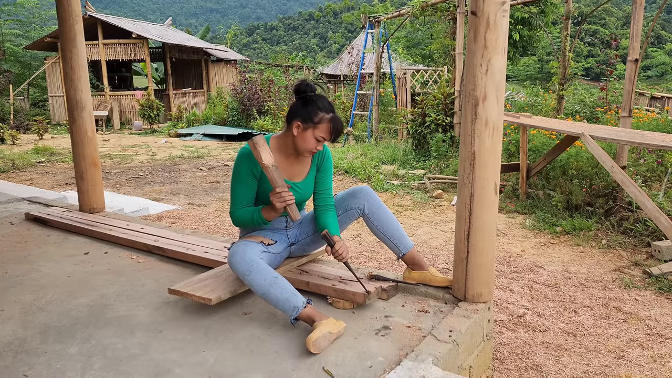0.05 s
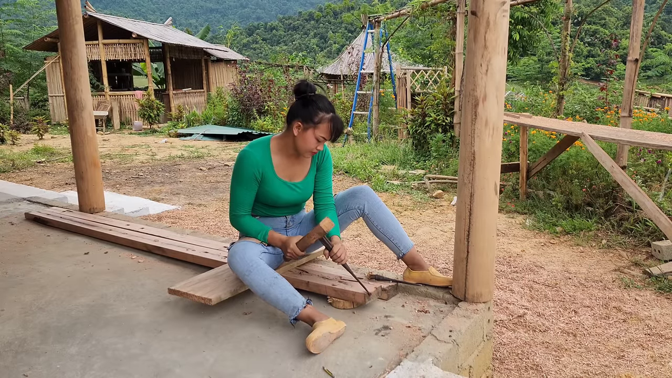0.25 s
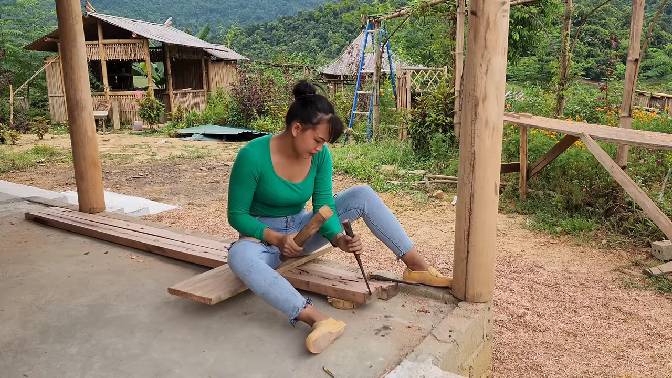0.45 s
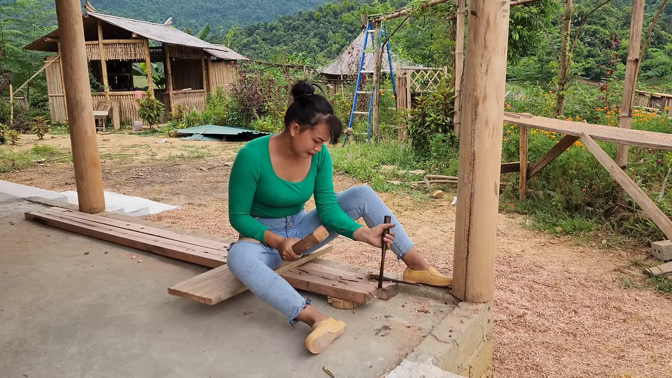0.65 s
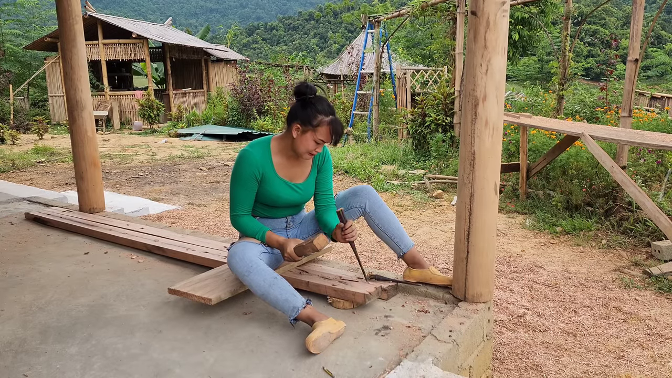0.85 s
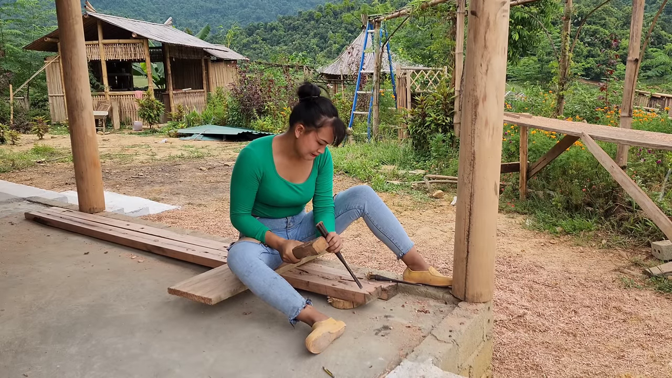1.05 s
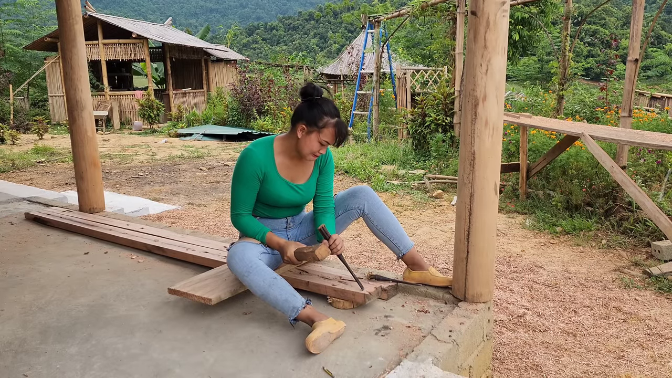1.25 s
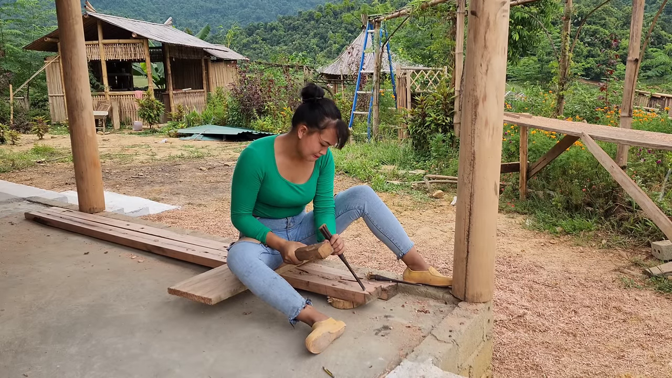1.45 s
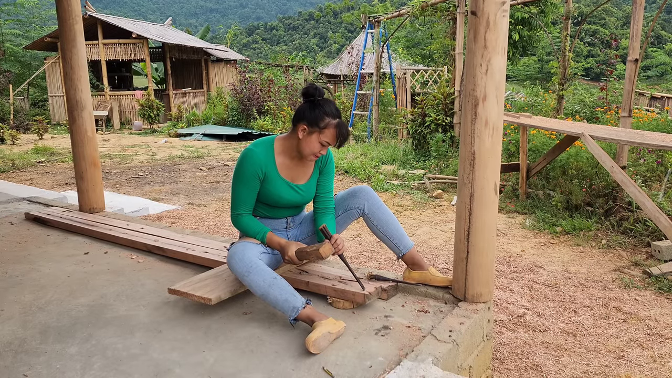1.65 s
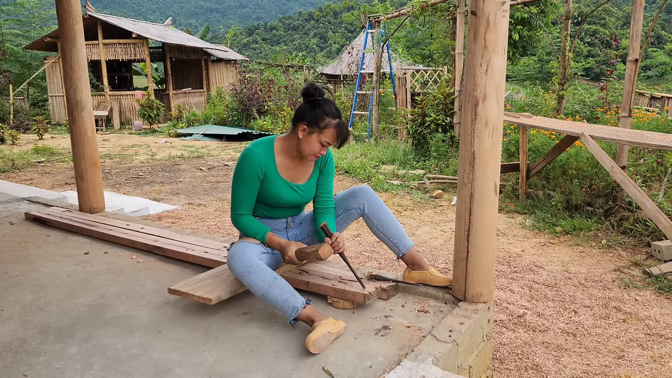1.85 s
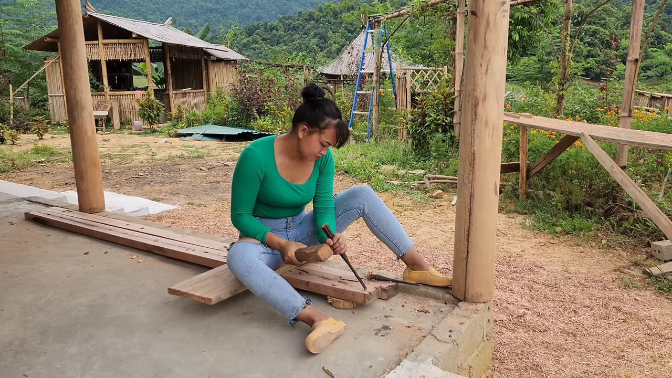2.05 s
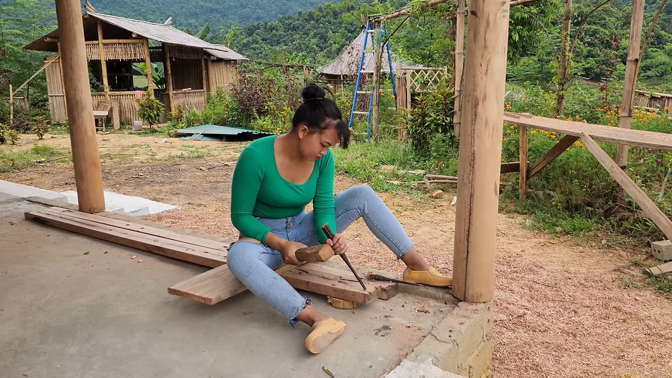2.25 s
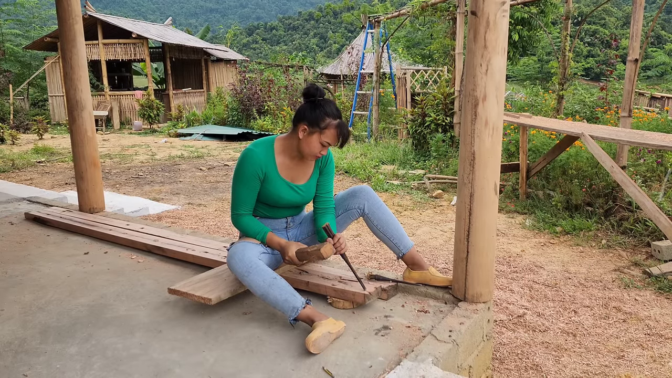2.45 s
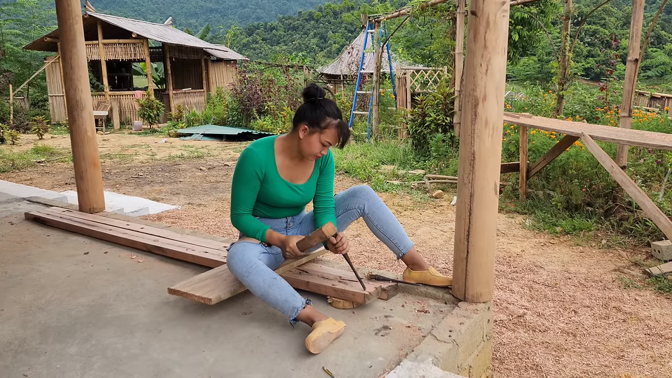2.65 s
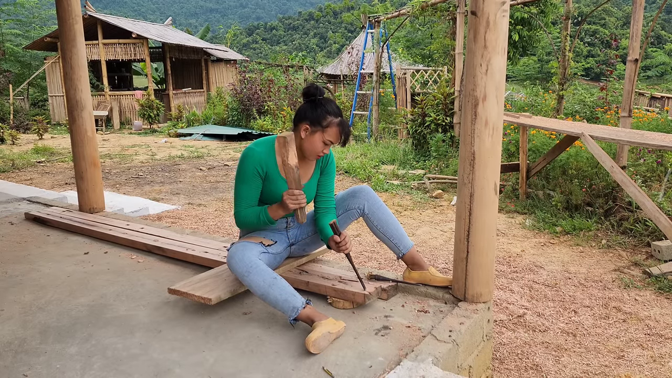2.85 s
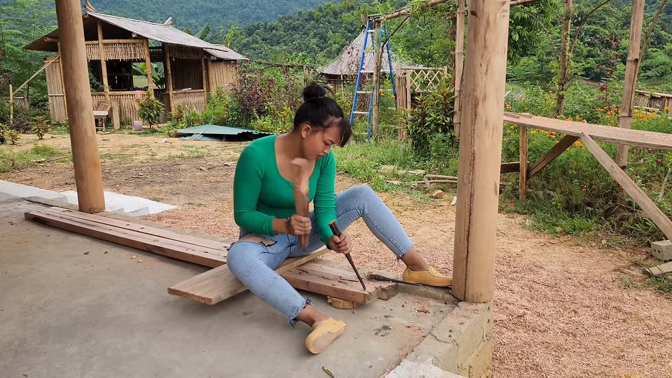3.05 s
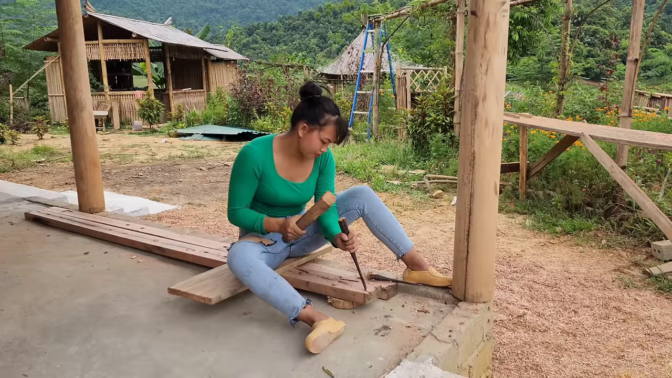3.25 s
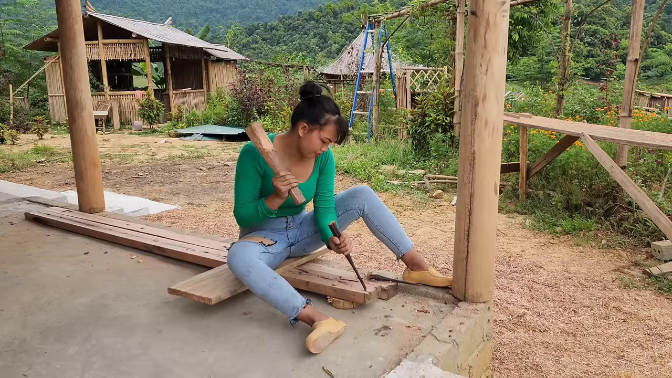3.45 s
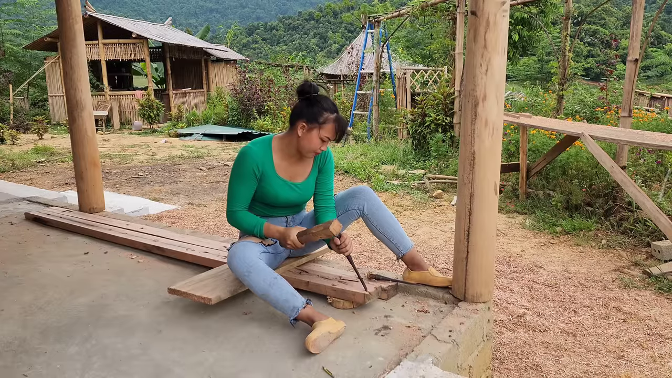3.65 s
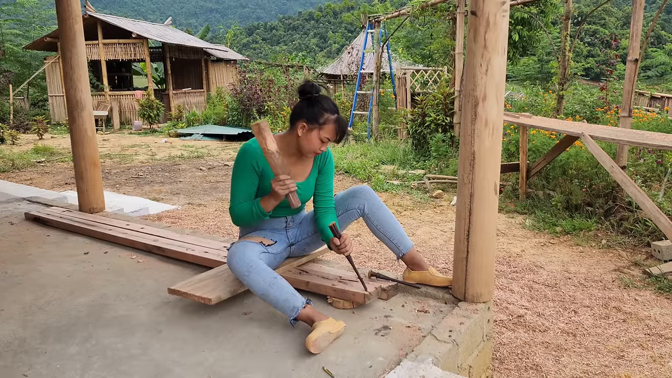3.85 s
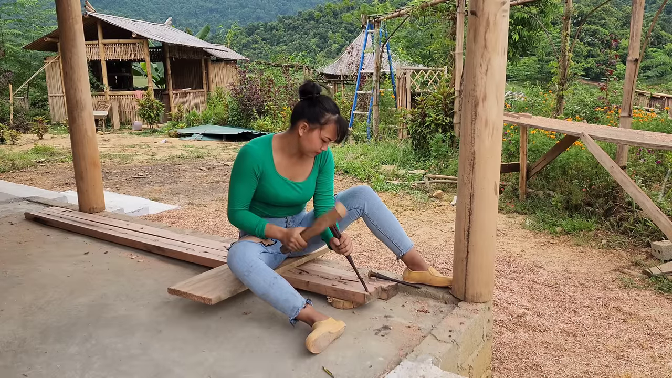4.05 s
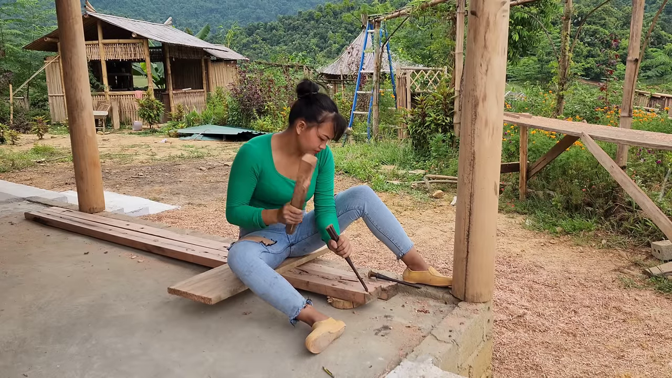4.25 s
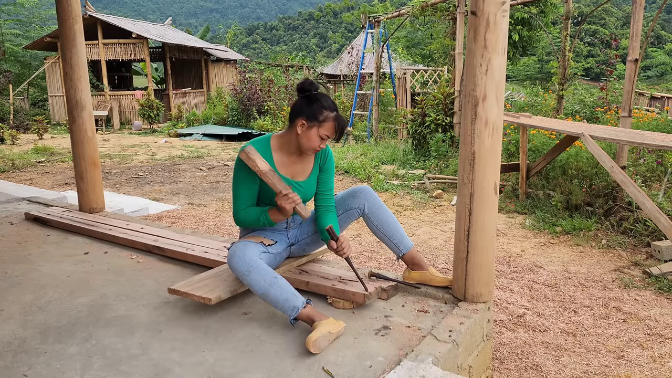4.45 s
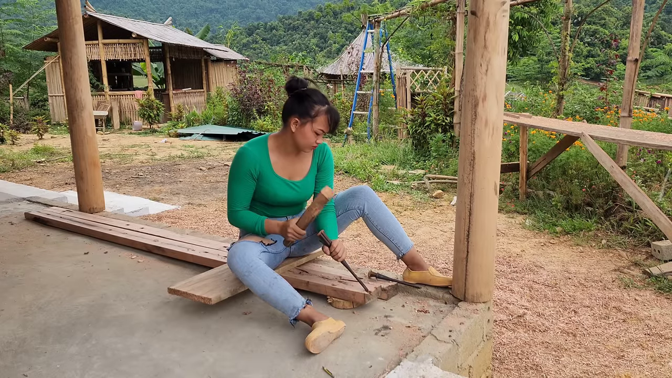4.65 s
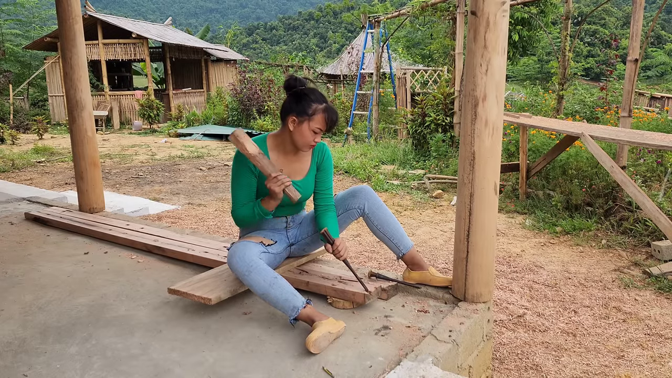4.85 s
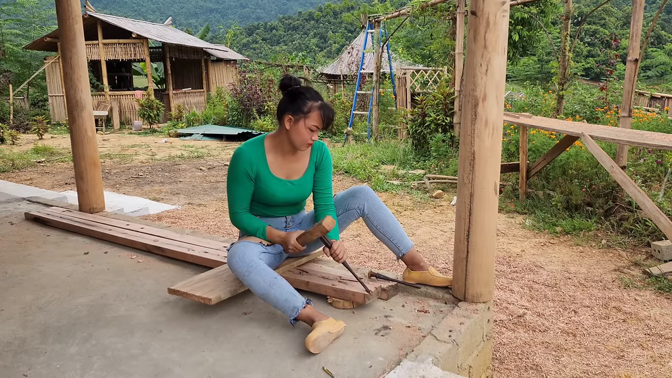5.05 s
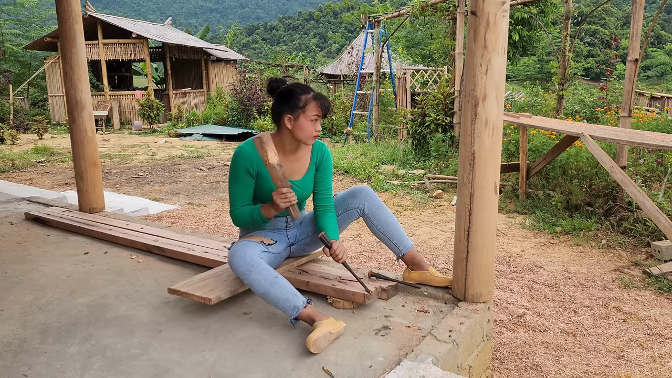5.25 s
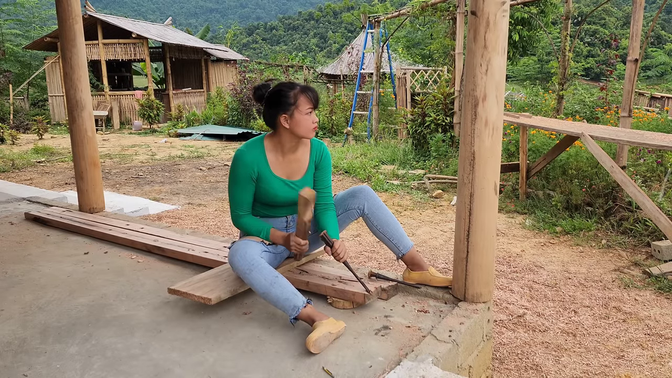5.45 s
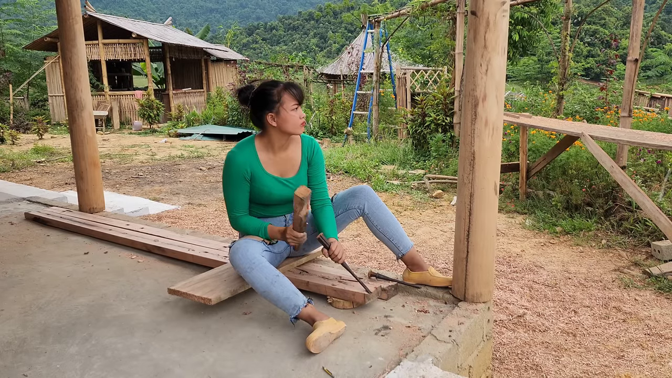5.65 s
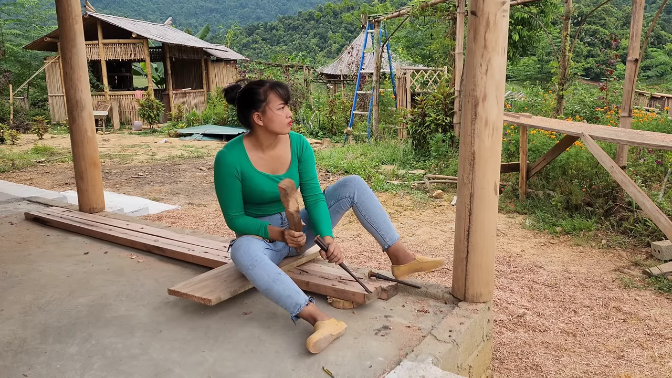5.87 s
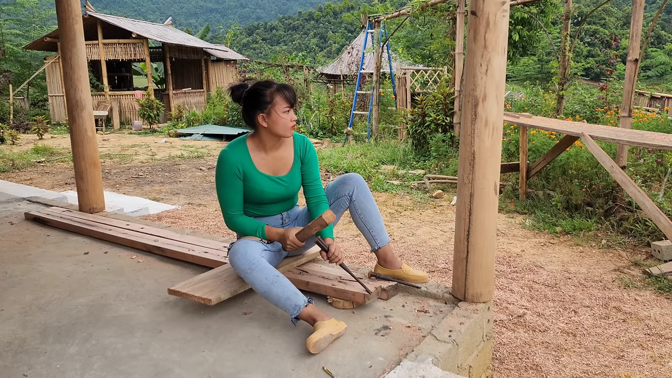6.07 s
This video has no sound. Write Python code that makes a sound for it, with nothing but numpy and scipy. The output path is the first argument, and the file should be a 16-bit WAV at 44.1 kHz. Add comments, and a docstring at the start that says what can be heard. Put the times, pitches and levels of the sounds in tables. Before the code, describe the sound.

Sharp woody chisel knocks on an open porch: one blow, a quiet gap of small bumps, then evenly paced blows over faint insects and motor drone.

```python
"""Mallet blows on a steel chisel are heard first: the plank it cuts knocks, the fibres crack, the porch and roof answer.
The tail of one blow and a full blow precede a pause with soft bumps and ticks; seven more blows follow.
Knocks and hums are sums of decaying modes; cracks and splinters are short bursts of filtered noise.
Behind them lie broadband background noise, far insects of shaped noise and a motor drone of steady partials."""
import sys
import numpy as np
from scipy import signal
from scipy.fft import rfft, irfft, next_fast_len
from scipy.io import wavfile

SR = 44100
rng = np.random.default_rng(int(sys.argv[2]) if len(sys.argv) > 2 else 0)


def generate_wav(signal):
    """Clip the signal to [-1, 1] and save it as 16-bit WAV at the path in sys.argv[1]."""
    frames = np.transpose(np.atleast_2d(signal))
    scaled = np.clip(frames, -1, 1) * 32767
    pcm = np.round(scaled).astype(np.int16)
    wavfile.write(sys.argv[1], SR, pcm)


N = 269439   # length in samples
TIME = np.arange(N) / SR
AGE = np.arange(2 * SR) / SR   # seconds since a blow
KNOCK_AGE = AGE[:SR // 3]   # the same for short sounds

# Side relative to mid for the direct sound. Each row: frequency in Hz, level in dB.
WIDTH = [(100, -26.5), (350, -18.5), (700, -16), (1300, -7.5), (2400, -2), (4500, -6), (8000, 3.5),
         (15000, 1.5)]


def from_db(db):
    """Level law: an amplitude gain is ten to the power dB / 20."""
    return 10 ** (np.asarray(db) / 20)


def rms_one(x):
    """Power normalisation: scale to rms 1."""
    return x / np.sqrt(np.mean(x ** 2) + 1e-20)


def knock_one(x):
    """Energy normalisation: a transient gets the energy of rms 1 lasting a twentieth of a second."""
    energy = np.mean(np.sum(x ** 2, axis=-1))
    return x / np.sqrt(energy * 20 / SR + 1e-20)


def at_hz(points, hz):
    """Logarithmic pitch: (Hz, value) points are interpolated on a log-frequency axis."""
    points = np.array(points)
    return np.interp(np.log(np.maximum(hz, 1)), np.log(points[:, 0]), points[:, 1])


def dying(age, t60):
    """Exponential damping: 60 dB down after t60 seconds."""
    return np.exp(-np.log(1000) * age / t60)


def bell(offset, width):
    """Gaussian hump of height 1 around zero."""
    return np.exp(-(offset / width) ** 2)


def add(out, s, sound):
    """Superposition: mix a sound in from s seconds, keeping only what falls inside the output."""
    at = round(s * SR)
    first, last = max(at, 0), min(at + sound.shape[-1], N)
    out[:, first:last] += sound[..., first - at:last - at]


def coloured(x, points):
    """Minimum-phase filtering: a folded cepstrum turns (Hz, dB) points into a causal response."""
    size = 2 * next_fast_len(x.shape[-1] // 2 + SR // 20)
    gain = from_db(at_hz(points, np.fft.rfftfreq(size, 1 / SR)))
    cepstrum = irfft(np.log(gain))
    cepstrum[1:size // 2] *= 2
    cepstrum[size // 2 + 1:] = 0
    response = np.exp(rfft(cepstrum))
    return irfft(rfft(x, size) * response)[..., :x.shape[-1]]


def stereo(mid, side):
    """Sum and difference: left and right from mid and side."""
    return np.array([mid + side, mid - side])


def diffuse(size):
    """Diffuse-field coherence: white noise whose likeness between left and right depends on frequency."""
    # Each row: frequency in Hz, left-right correlation from -1 (opposed) to 1 (identical).
    likeness = [(60, 0.78), (130, 1), (290, .79), (640, 0.4), (1400, -0.54), (3100, -0.31), (7000, 0.072),
                (15000, -0.74)]
    padded = 2 * next_fast_len(size // 2 + 1)
    alike = np.clip(at_hz(likeness, np.fft.rfftfreq(padded, 1 / SR)), -1, 1)
    mid, side = rfft(rng.standard_normal((2, padded)))
    return irfft(stereo(mid * np.sqrt((1 + alike) / 2), side * np.sqrt((1 - alike) / 2)))[:, :size]


def drift(rate):
    """Slow modulation: straight lines join random values of spread 1, drawn rate times a second."""
    return np.interp(TIME * rate, np.arange(4096), rng.standard_normal(4096))


def mallet(hz, length_s):
    """Impact of wood on the handle: a damped clack of a few cycles."""
    shape = KNOCK_AGE ** 2 * np.exp(-2 * KNOCK_AGE / length_s)
    return knock_one(shape * np.sin(2 * np.pi * hz * KNOCK_AGE))


def crack(snap_t60, splinter_db, splinter_t60, rise_s):
    """Brittle fracture: a hard noisy snap at the contact over a longer splintering of fibres."""
    # Contact and cut fibres. Each row: frequency in Hz, spectral level in dB per Hz.
    spectrum = [(100, -18.5), (400, -3.5), (800, 2), (1400, 5.5), (1800, -1.5), (2400, -3), (3000, -9),
                (4500, -14.5), (6000, -15.5), (7500, -14), (9300, -27), (11500, -25), (15500, -26)]
    snap = dying(KNOCK_AGE, snap_t60)
    splinter = from_db(splinter_db) * dying(KNOCK_AGE, splinter_t60)
    shape = (1 - np.exp(-KNOCK_AGE / rise_s)) * (snap + splinter)
    mid, side = rng.standard_normal((2, len(shape))) * shape
    return knock_one(coloured(stereo(mid, coloured(side, WIDTH)), spectrum))


def splitting(delay_s, t60):
    """Delayed fracture: the wood ahead of the edge gives way milliseconds into the blow."""
    # Splitting fibres. Each row: frequency in Hz, spectral level in dB per Hz.
    spectrum = [(300, -15.5), (1500, -4), (2800, -2), (4200, 5.5), (6500, -3), (8000, -4.5), (9500, -21),
                (15500, -14)]
    age = KNOCK_AGE - delay_s
    shape = dying(np.abs(age), t60) * (age > 0)
    mid, side = rng.standard_normal((2, len(age))) * shape
    return knock_one(coloured(stereo(mid, coloured(side, WIDTH)), spectrum))


def plank(swell_cycles, spread_db, driven_s):
    """Bending modes: each swells as waves fill the plank, holds while it is driven, then dies."""
    # Modes of plank and mallet. Each row: frequency in Hz, level in dB, t60 in seconds.
    modes = [(118, -19.5, .14), (153.7, -13.5, 0.28), (178, -13, 0.17), (209, -10.5, 0.071),
             (284, -11, 0.036), (313, -10.5, 0.045), (347, -9.5, 0.052), (473, -11, 0.11),
             (569.1, -7.5, 0.036), (594, -7, 0.067), (659, -10.5, 0.045), (757, -7.5, .06),
             (789, -6.5, 0.043), (808, -8.5, 0.077), (964, -7.5, 0.091), (1056, -7, 0.044),
             (1143.3, -5, 0.082), (1200.4, -3, 0.082), (1280, -5, 0.052), (1387, -4.5, 0.1),
             (1488, -5, 0.068), (1646, -9.5, 0.031), (1790, -14.5, 0.054), (1934, -17, .05),
             (2140, -20, 0.066), (2326, -13.5, 0.064), (2590, -17, .05), (3566, -22.5, .06),
             (7340, -28.5, .03), (11800, -30, .035)]
    hz, level_db, t60 = np.array(modes).T[:, :, None]
    gain = from_db(level_db + spread_db * rng.standard_normal(hz.shape))
    swell = 1 - np.exp(-KNOCK_AGE * hz / swell_cycles)
    shape = gain * swell * dying(np.maximum(KNOCK_AGE - driven_s, 0), t60)
    # each mode radiates from other places along the plank, so it has its own phase and direction
    phase, direction = rng.uniform(0, 2 * np.pi, (2,) + hz.shape)
    turn = 2 * np.pi * hz * KNOCK_AGE + phase
    mid = np.sum(shape * np.sin(turn), axis=0)
    side = np.sum(shape * from_db(at_hz(WIDTH, hz)) * np.sin(turn + direction), axis=0)
    return knock_one(stereo(mid, side))


def chisel():
    """Free vibration: the steel blade's bending modes ring on after the mallet has left it."""
    # Modes of the blade. Each row: frequency in Hz, level in dB, t60 in seconds.
    modes = [(1148, -1, 0.29), (1180, -5, 0.33), (1266, -6.5, 0.24), (2630, -17, .2)]
    hz, level_db, t60 = np.array(modes).T[:, :, None]
    phase = rng.uniform(0, 2 * np.pi, hz.shape)
    rings = from_db(level_db) * dying(KNOCK_AGE, t60) * np.sin(2 * np.pi * hz * KNOCK_AGE + phase)
    return knock_one(rings.sum(axis=0))


def bite(thud_db, hardness_db, chip_hz, chip_db, splinter_hz):
    """Resonance and contact stiffness: (Hz, dB) colour of a blow; a harder contact has more treble."""
    hz = np.geomspace(40, 20000, 120)
    # the plank bends as a whole when the edge stops dead; widths are in octaves
    thud = thud_db * bell(np.log2(hz / 284), .42)
    # the wood under the edge resonates
    chip = chip_db * bell(np.log2(hz / chip_hz), 0.31)
    # the snapping splinter favours one pitch, by 5 dB
    splinter = 5 * bell(np.log2(hz / splinter_hz), 0.25)
    contact_hz = 2780   # above this a hard contact is brighter, a cushioned one duller
    contact = hardness_db * hz ** 2 / (hz ** 2 + contact_hz ** 2)
    return np.column_stack([hz, thud + chip + splinter + contact])


def porch(onset_s, scatter_db, scatter_t60):
    """Reverberation: quick scatter off floor and posts, and a tail that decays band by band."""
    # Bands of the tail. Each row: centre in Hz, gain in dB, t60 in seconds.
    bands = [(60, -10.5, 1.2), (150, -9, 1.2), (298, -11, 0.7), (610, -20, 1.1), (1200, -13.5, 0.61),
             (2300, -15.5, 0.61), (3200, -16.5, 0.46), (6710, -21, 0.48), (9840, -21, 0.35),
             (16100, -20, 0.45)]
    centres = np.array(bands)[:, 0]
    noise = rfft(diffuse(len(AGE)))
    hz = np.fft.rfftfreq(len(AGE), 1 / SR)
    onset = 1 - np.exp(-(AGE / onset_s) ** 2)
    tail = 0
    # each band fades into its neighbours on the log-frequency axis
    for share, (_, level_db, t60) in zip(np.eye(len(bands)), bands):
        band = irfft(noise * at_hz(np.column_stack([centres, share]), hz))
        shape = dying(AGE, t60) * onset
        tail = tail + from_db(level_db) * band * shape / np.linalg.norm(shape)
    scatter = dying(AGE, scatter_t60) * AGE
    return tail + from_db(scatter_db) * diffuse(len(AGE)) * scatter / np.linalg.norm(scatter)


def roof(swell_s, spread_db):
    """Beating: the low modes of the roof build up, lie close in pitch and interfere."""
    # Modes of the roof. Each row: frequency in Hz, level in dB, t60 in seconds.
    modes = [(54.2, -11.5, 1.8), (66, -11.5, 1.7), (80.8, -6.5, 2.7), (103, -8, 1.5), (118.4, -4, 2.8),
             (132, -2.5, 1.8), (153, -3.5, 1.9), (157.8, -6, 3), (169, -5.5, 1.9)]
    hz, level_db, t60 = np.array(modes).T[:, :, None]
    gain = from_db(level_db + spread_db * rng.standard_normal(hz.shape))
    phase = rng.uniform(0, 2 * np.pi, hz.shape)
    rings = gain * dying(AGE, t60) * np.sin(2 * np.pi * hz * AGE + phase)
    return rings.sum(axis=0) * (1 - np.exp(-AGE / swell_s))


def chopping(clack_db, roof_db):
    """Impact excitation: each blow has its own strength and colour; porch and roof respond."""
    # Mallet blows. Each row: start in seconds, level in dB, chisel ring in dB, thud of the plank in dB,
    # hardness of the contact in dB, chip resonance in Hz, chip resonance in dB, splinter pitch in Hz,
    # delay of the splitting in seconds, splitting in dB.
    blows = [(-.22, -16.5, -25.5, 3, -10, 2130, 7, 2470, .005, -18.5),
             (0.2756, -16, -18, 4.5, -3.5, 1096, 4, 2450, 0.0046, -19.5),
             (3.157, -15.5, -19.5, 12.5, -6.5, 600, 9.5, 3960, 0.0056, -3),
             (3.6475, -14, -28.5, 0.5, 0.5, 2100, 10, 4800, 0.0012, -13.5),
             (4.128, -13, -11.5, -2, -4.5, 1360, 3, 2780, .001, -19.5),
             (4.590, -14, -30, 3, -5, 874, 8.5, 1620, 0.0024, -22),
             (5.048, -16, -27.5, 2.5, 0.5, 2204, 4.5, 13630, 0.012, -21),
             (5.5454, -20, -24.5, 3, -5.5, 573, 9.5, 11000, 0.00082, -18),
             (5.994, -25.5, -9, -0.5, -11.5, 470, 6, 3280, 0.0014, -18)]
    out = np.zeros((2, N))
    space = porch(onset_s=0.024, scatter_db=-11.5, scatter_t60=0.059)
    for s, level_db, ring_db, thud_db, hardness_db, chip_hz, chip_db, splinter_hz, split_s, split_db in blows:
        snap = crack(snap_t60=.02, splinter_db=-7.5, splinter_t60=0.14, rise_s=0.00042)
        clack = from_db(clack_db) * mallet(hz=1168, length_s=0.0026)
        body = plank(swell_cycles=1.2, spread_db=0.5, driven_s=.011)
        split = from_db(split_db) * splitting(split_s, t60=0.019)
        colour = bite(thud_db, hardness_db, chip_hz, chip_db, splinter_hz)
        knock = knock_one(coloured(snap + clack + body + split, colour))
        direct = from_db(level_db) * (knock + from_db(ring_db) * chisel())
        add(out, s, direct)
        add(out, s, signal.fftconvolve(direct, space, axes=1))
        add(out, s, from_db(level_db + roof_db) * roof(swell_s=0.018, spread_db=0.5))
    return out


def background_noise(floor_db, waver_db):
    """Broadband noise: its level rises around the pause, falls again and wavers a little."""
    # Each row: frequency in Hz, spectral level in dB per Hz.
    spectrum = [(25, -25), (55, -14), (90, -9), (130, -10.5), (200, -11), (350, -16.5), (500, -17.5),
                (750, -12.5), (1200, -12), (1840, -16), (3520, -21.5), (5880, -32), (8200, -31.5),
                (9500, -45), (16000, -46.5)]
    rise_db = 5.5 * bell(TIME - 3.39, 1.7)   # peak and width in seconds
    level_db = floor_db + rise_db + waver_db * drift(14)
    return from_db(level_db) * rms_one(coloured(diffuse(N), spectrum))


def motor(level_db, waver_db, wander):
    """Harmonic series: a far drone whose partials fade and wander in phase (radians) on the way."""
    # Partials of the drone. Each row: frequency in Hz, relative level in dB.
    partials = [(91.5, -3.5), (183, 2.5), (274.5, 0), (549, -17.5)]
    tones = 0
    for hz, db in partials:
        loudness = from_db(db + waver_db * drift(1.8))
        tones = tones + loudness * np.sin(2 * np.pi * hz * TIME + wander * drift(27))
    return from_db(level_db) * rms_one(tones)


def insect(calls, band, edge_s, flutter_db):
    """Stridulation: bursts of band-limited wing rasping, their edges blurred by distance."""
    loudness = 0
    for start, end, db in calls:
        rise = np.clip((TIME - start) / edge_s, 0, 1)
        fall = np.clip(2 * (end - TIME) / edge_s, 0, 1)
        loudness = loudness + from_db(db) * rise * fall
    return loudness * from_db(flutter_db * drift(90)) * rms_one(coloured(diffuse(N), band))


def trill():
    """Sustained stridulation: a thin narrow-band trill further off."""
    # Each row: start in seconds, end in seconds, level in dB.
    stretches = [(0, 1.1, -89.5), (1.1, 2.5, -84.5), (2.5, 6.2, -87)]
    # Each row: frequency in Hz, spectral level in dB per Hz.
    band = [(4000, -40.5), (4800, -13), (5100, 0), (5400, -13), (6200, -38.5)]
    return insect(stretches, band, edge_s=.03, flutter_db=2.0)


def cricket(period_s, chirp_s):
    """Periodic stridulation: chirps at an even pace within each bout."""
    # Each row: start of a bout in seconds, its end in seconds, level in dB.
    bouts = [(.195, 1.76, -74), (3.24, 4.10, -67.5), (5.361, 5.89, -75.5)]
    # Each row: frequency in Hz, spectral level in dB per Hz.
    band = [(5500, -44.5), (7200, -10.5), (7800, -1), (8200, -1.5), (8700, -18), (10000, -55.5)]
    chirps = [(s, s + chirp_s, db) for start, end, db in bouts for s in np.arange(start, end, period_s)]
    return insect(chirps, band, edge_s=0.044, flutter_db=0.5)


def bush_cricket(rasp_s, level_db):
    """Broadband stridulation: one rasp repeated at a looser pace."""
    # Each entry: start of a rasp in seconds.
    starts = [.35, 1.22, 2.05, 2.801, 3.54, 4.24, 4.95, 5.73]
    # Each row: frequency in Hz, spectral level in dB per Hz.
    band = [(5000, -51.5), (8000, -4), (10000, -1), (12000, -1.5), (14500, 2), (15800, -13)]
    rasps = [(s, s + rasp_s, level_db) for s in starts]
    return insect(rasps, band, edge_s=0.033, flutter_db=1.0)


def handling():
    """Weak impacts: the chisel nudged in the cut bumps the wood; steel and falling chips tick."""
    # Each row: start in seconds, wooden bump in dB, tick in dB.
    touches = [(.634, -87, -78), (1.533, -64, -80.5), (1.831, -74, -85), (2.150, -61.5, -77.5),
               (2.184, -68, -80.5), (2.463, -65, -88.5), (5.649, -76.5, -64), (5.804, -74.5, -71),
               (5.863, -75.5, -68)]
    # filter points in (Hz, dB)
    bump_colour = [(150, -10), (330, 8.0), (500, -22.0), (1500, -15), (4000, -40)]
    tick_colour = [(1000, -14), (4000, 0), (11000, -3)]
    out = np.zeros((2, N))
    for s, bump_db, tick_db in touches:
        bump = coloured(plank(swell_cycles=0.78, spread_db=5.0, driven_s=.008), bump_colour)
        dry_snap = crack(snap_t60=0.0065, splinter_db=-24, splinter_t60=.04, rise_s=.0002)
        tick = coloured(dry_snap, tick_colour)
        add(out, s, from_db(bump_db) * knock_one(bump) + from_db(tick_db) * knock_one(tick))
    return out


def scene():
    """Superposition: the work on the porch over background noise, motor and insects."""
    work = chopping(clack_db=-8.5, roof_db=-28.5)
    background = background_noise(floor_db=-64, waver_db=1.87) + motor(level_db=-67.5, waver_db=2.0, wander=0.38)
    insects = trill() + cricket(period_s=.348, chirp_s=0.179) + bush_cricket(rasp_s=0.196, level_db=-74)
    return work + background + insects + handling()


def record(dry):
    """Saturation and band limiting: the highest peaks are rounded off and the top is cut."""
    cutoff_hz = 15900
    rounded = dry / (1 + dry ** 6) ** (1 / 6)
    lowpass = signal.ellip(10, .2, 80, cutoff_hz, fs=SR, output="sos")   # ripple and stopband in dB
    return signal.sosfilt(lowpass, rounded)


dry = scene()
out = record(dry)
generate_wav(out)
```